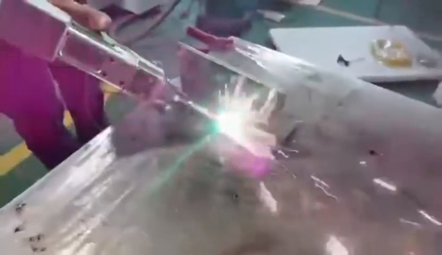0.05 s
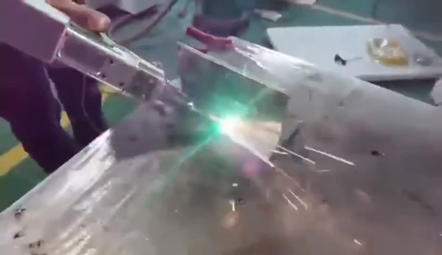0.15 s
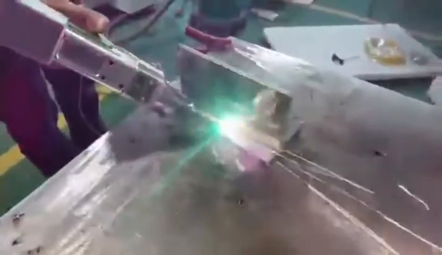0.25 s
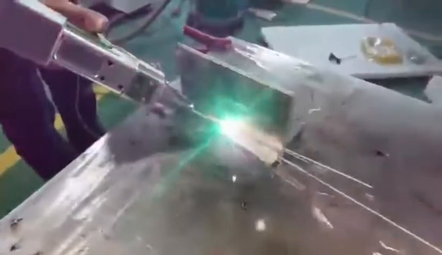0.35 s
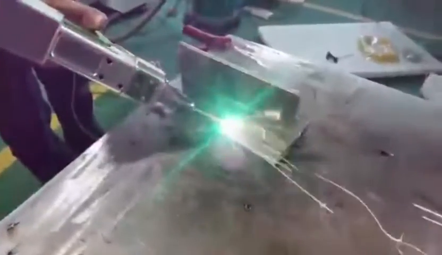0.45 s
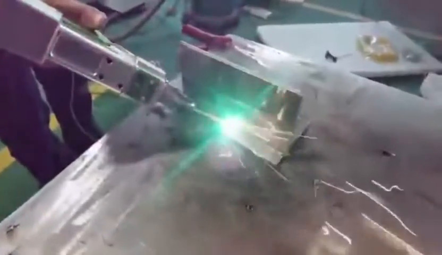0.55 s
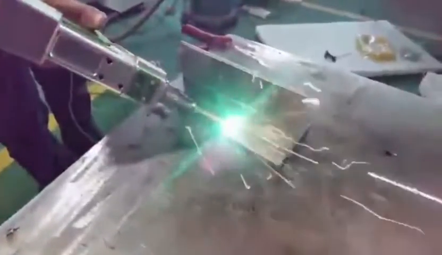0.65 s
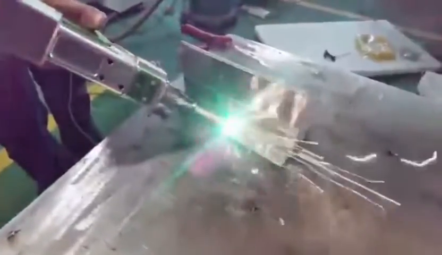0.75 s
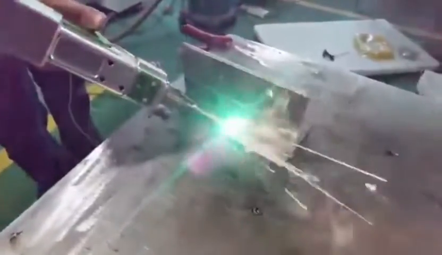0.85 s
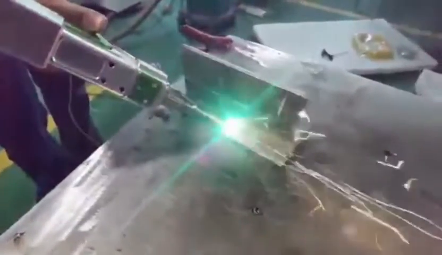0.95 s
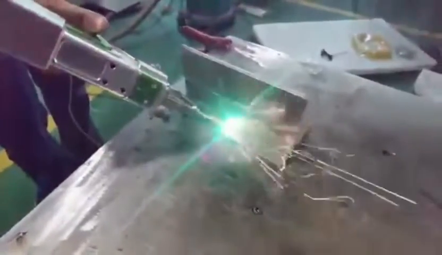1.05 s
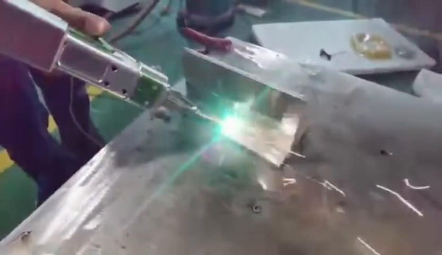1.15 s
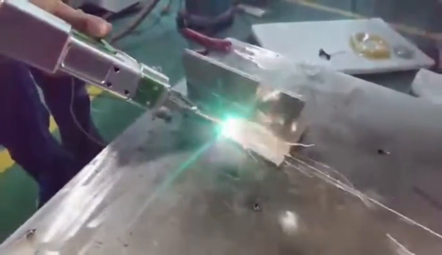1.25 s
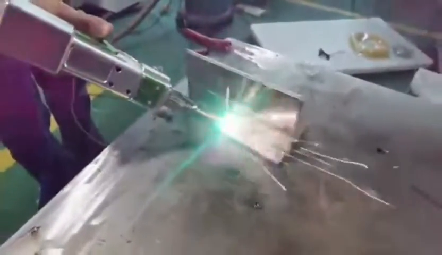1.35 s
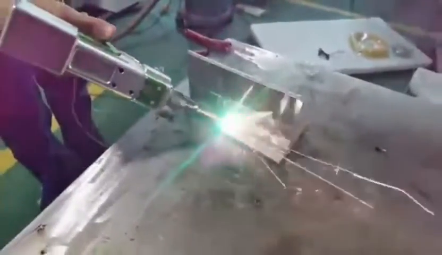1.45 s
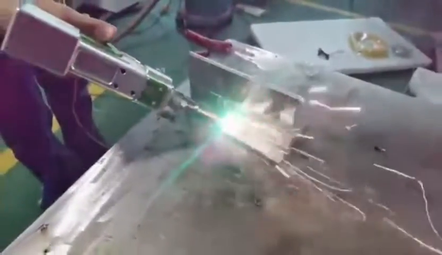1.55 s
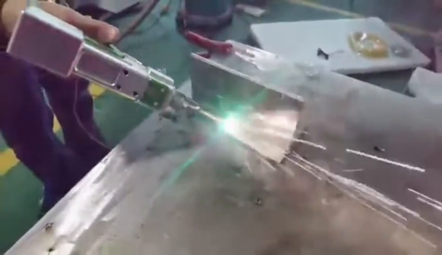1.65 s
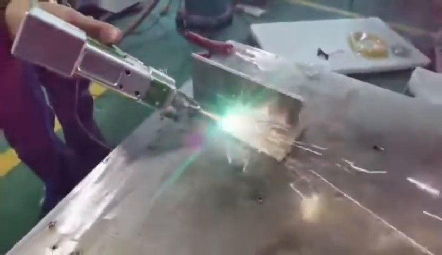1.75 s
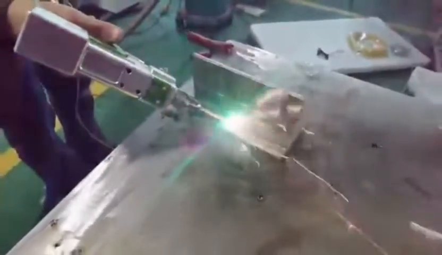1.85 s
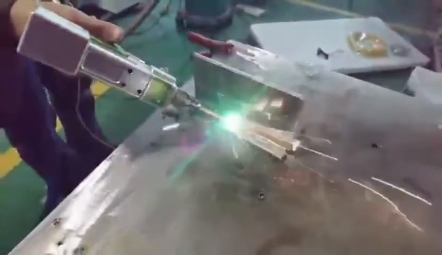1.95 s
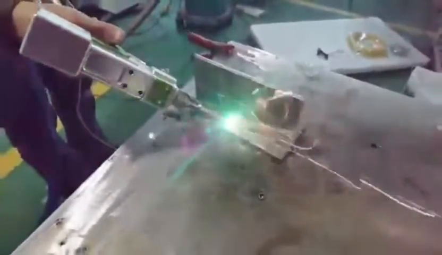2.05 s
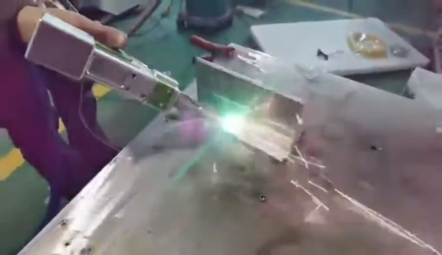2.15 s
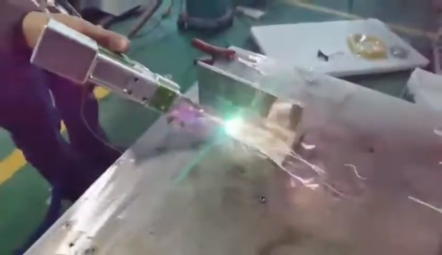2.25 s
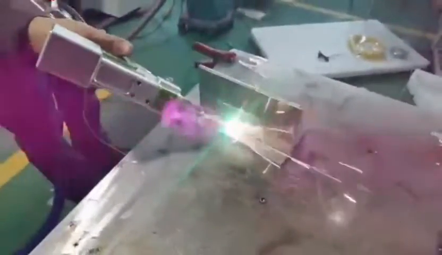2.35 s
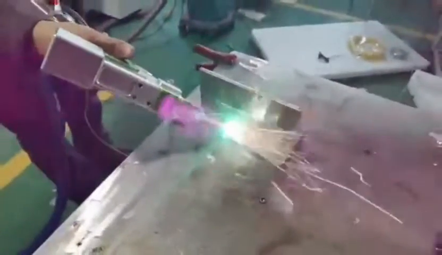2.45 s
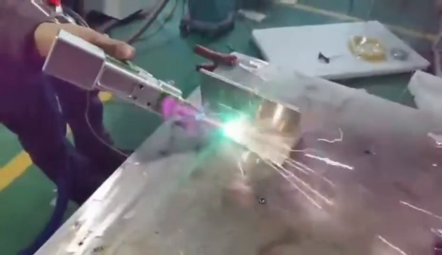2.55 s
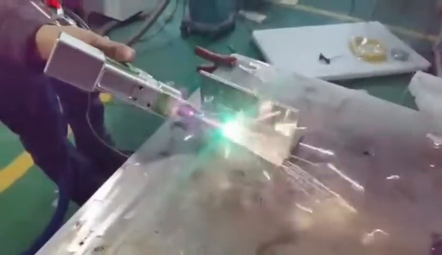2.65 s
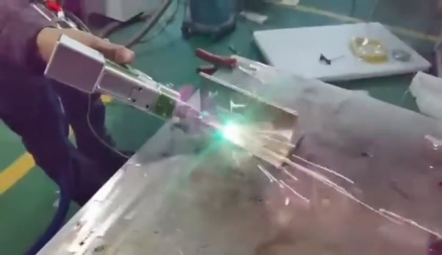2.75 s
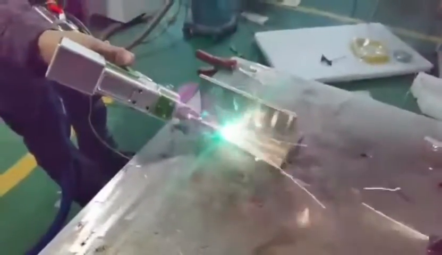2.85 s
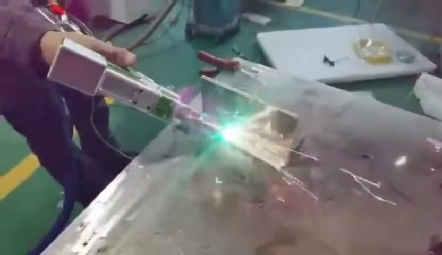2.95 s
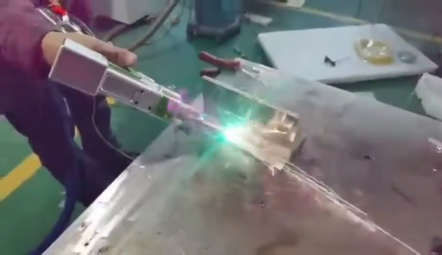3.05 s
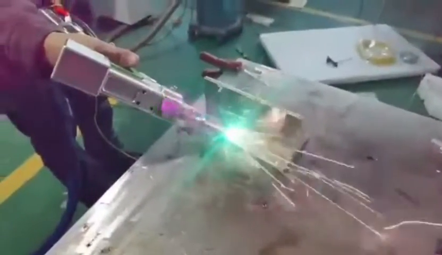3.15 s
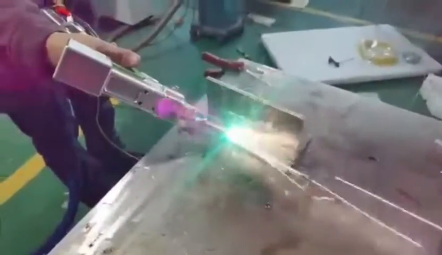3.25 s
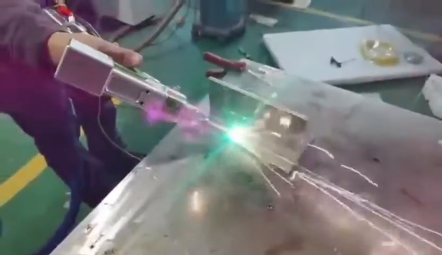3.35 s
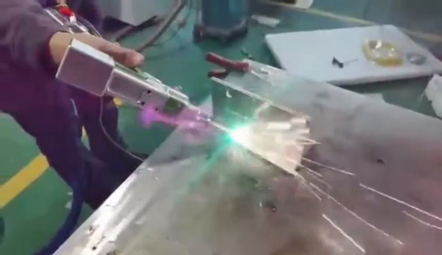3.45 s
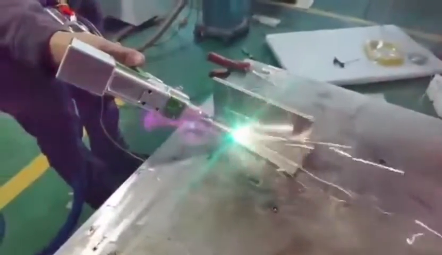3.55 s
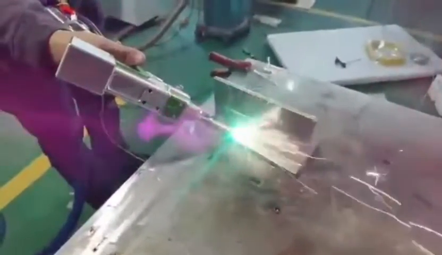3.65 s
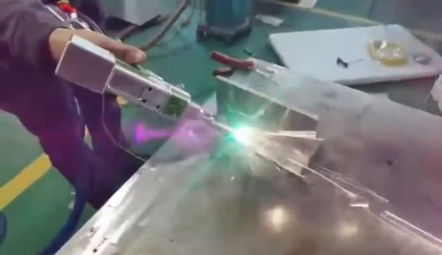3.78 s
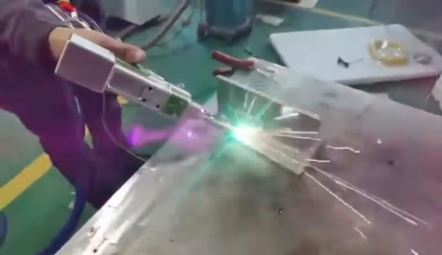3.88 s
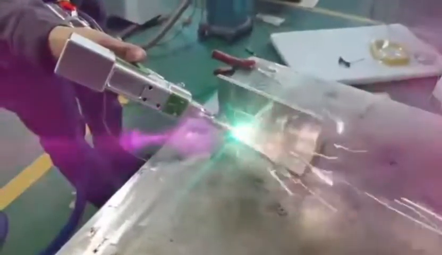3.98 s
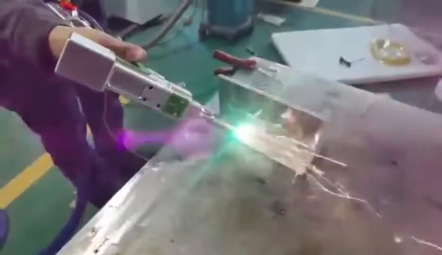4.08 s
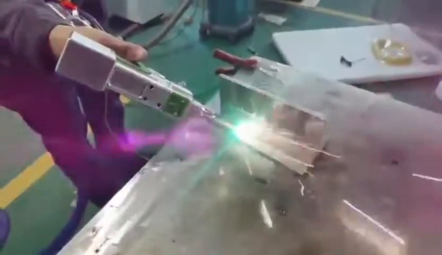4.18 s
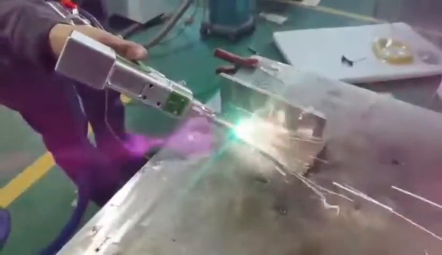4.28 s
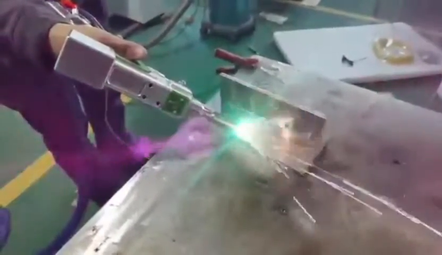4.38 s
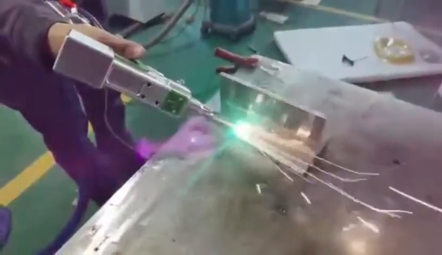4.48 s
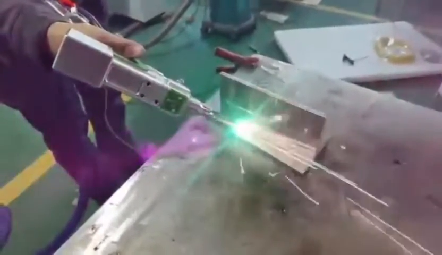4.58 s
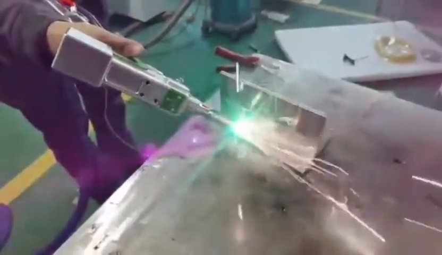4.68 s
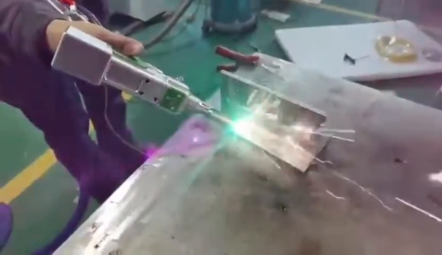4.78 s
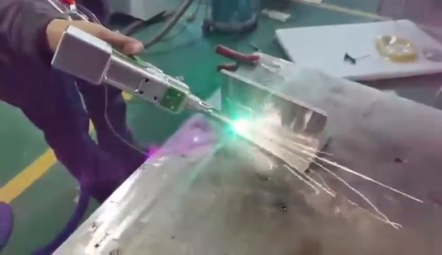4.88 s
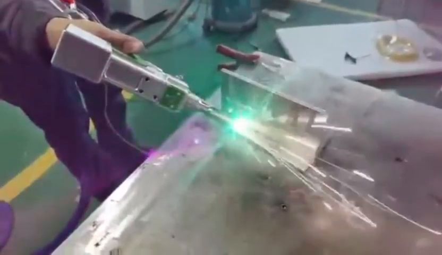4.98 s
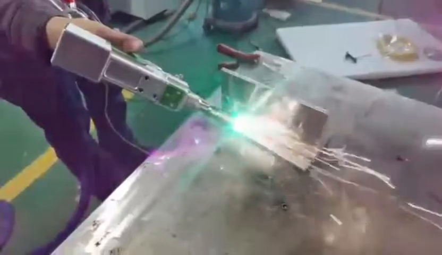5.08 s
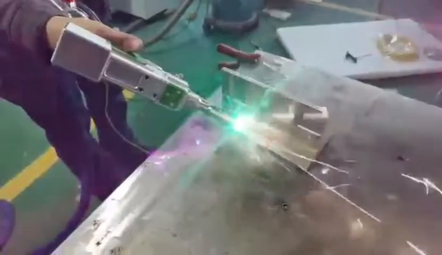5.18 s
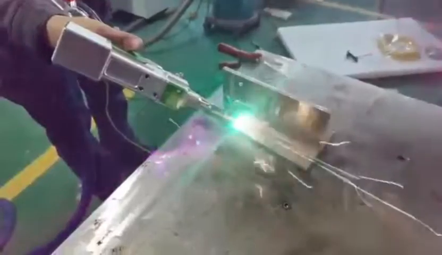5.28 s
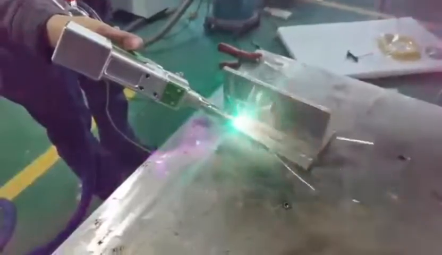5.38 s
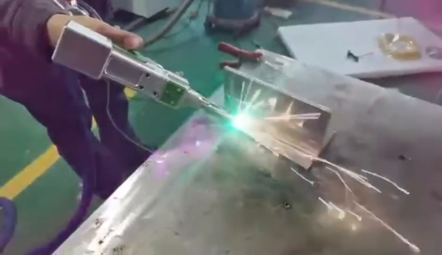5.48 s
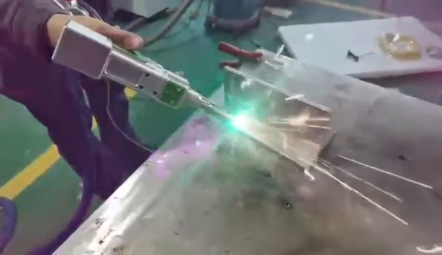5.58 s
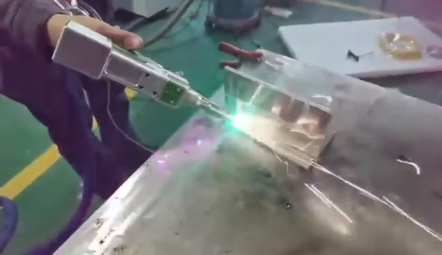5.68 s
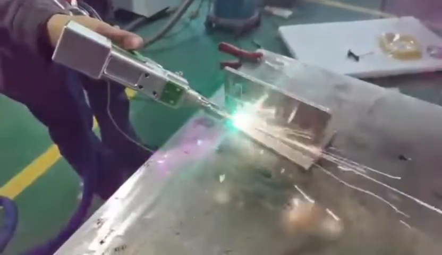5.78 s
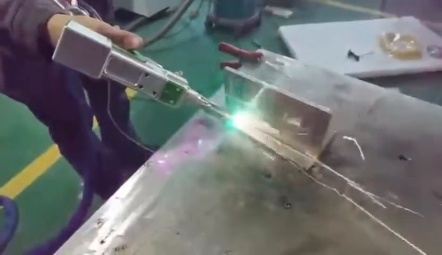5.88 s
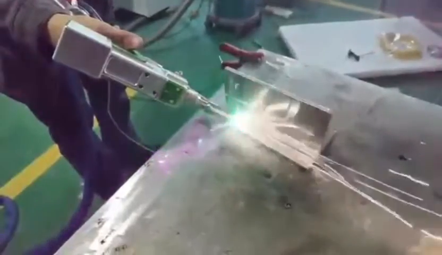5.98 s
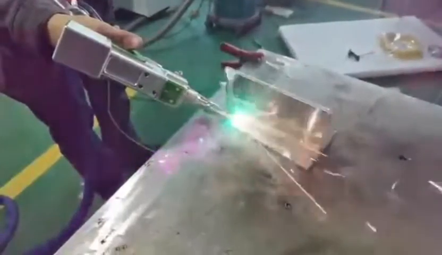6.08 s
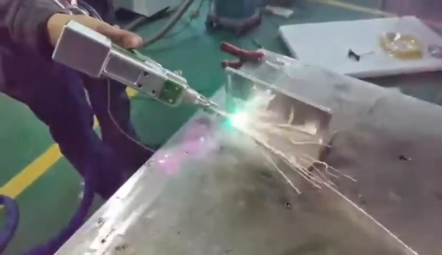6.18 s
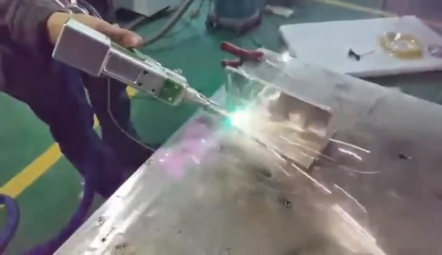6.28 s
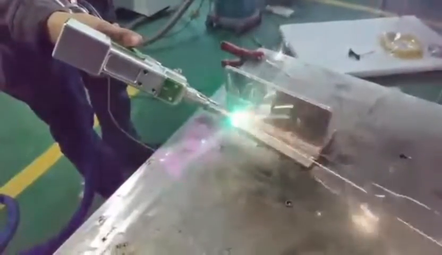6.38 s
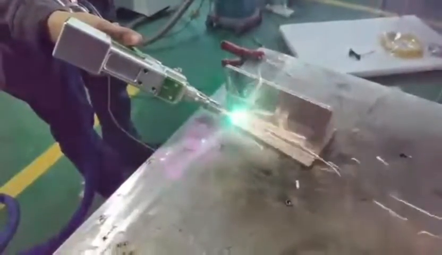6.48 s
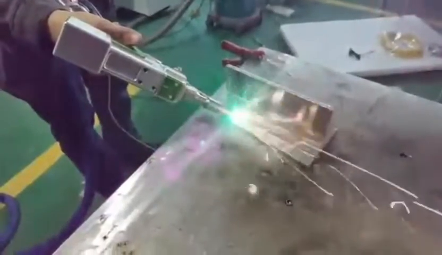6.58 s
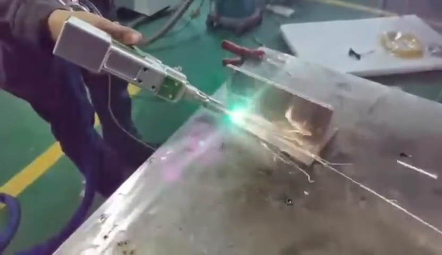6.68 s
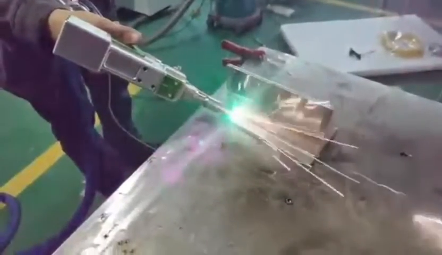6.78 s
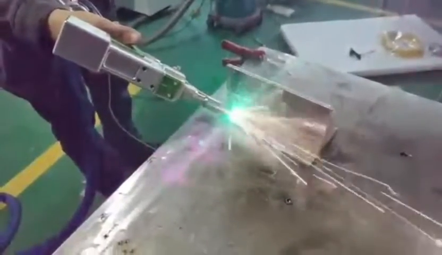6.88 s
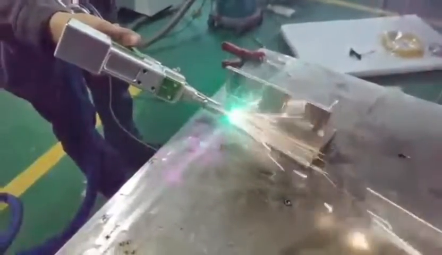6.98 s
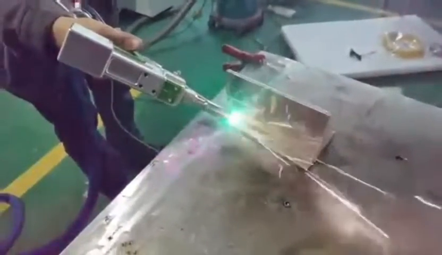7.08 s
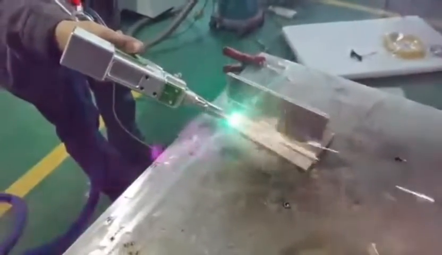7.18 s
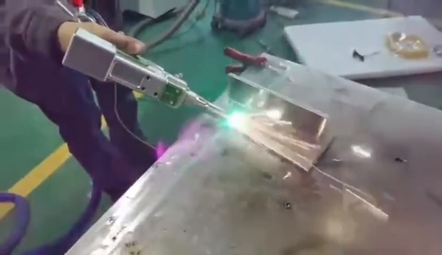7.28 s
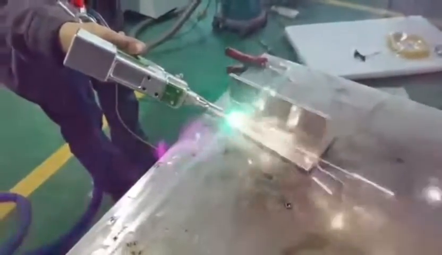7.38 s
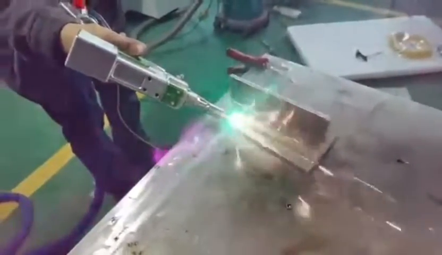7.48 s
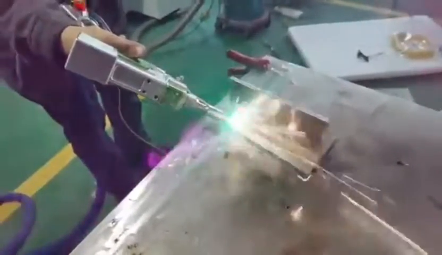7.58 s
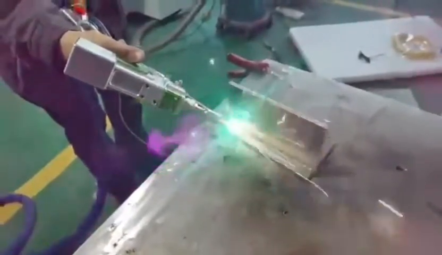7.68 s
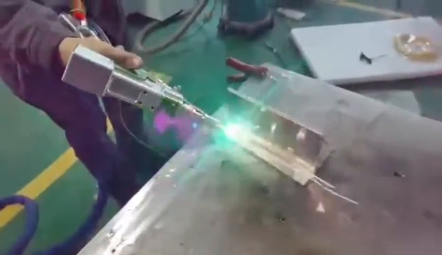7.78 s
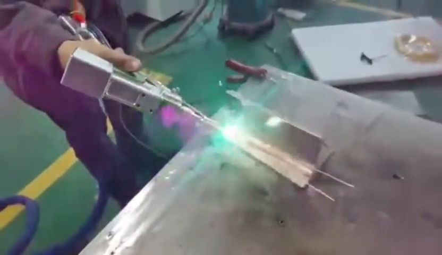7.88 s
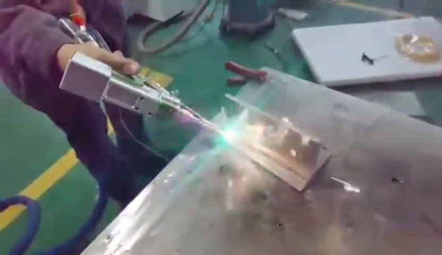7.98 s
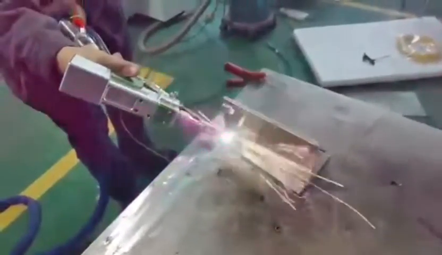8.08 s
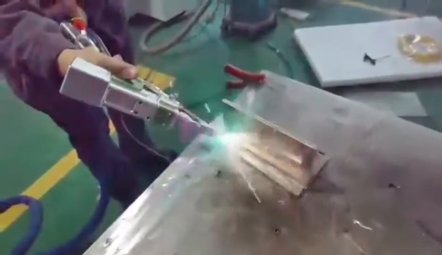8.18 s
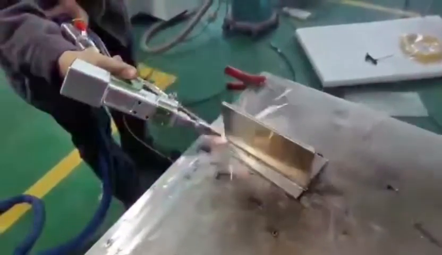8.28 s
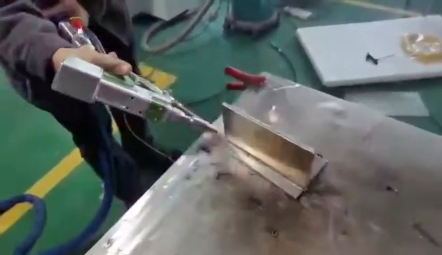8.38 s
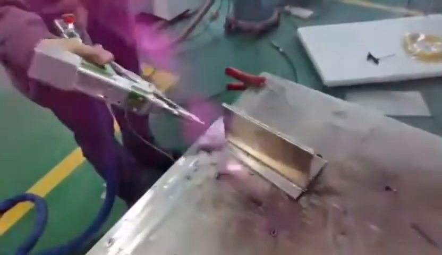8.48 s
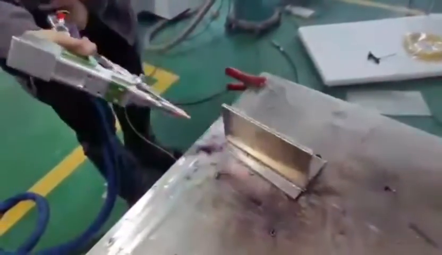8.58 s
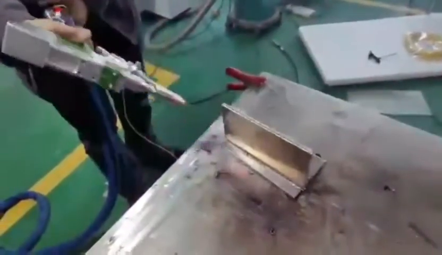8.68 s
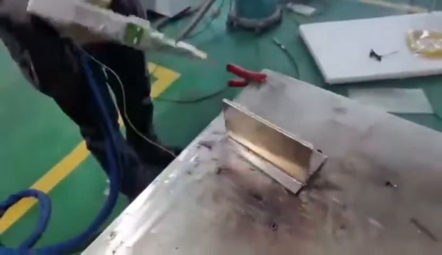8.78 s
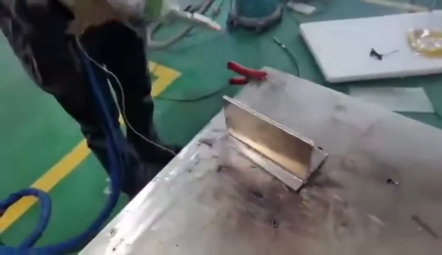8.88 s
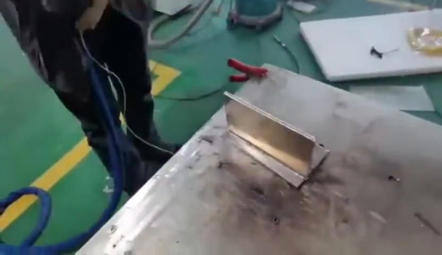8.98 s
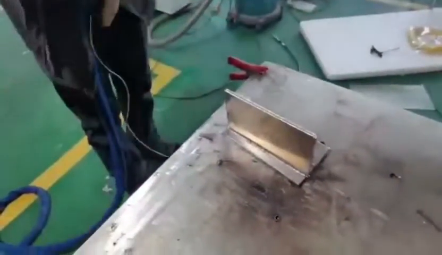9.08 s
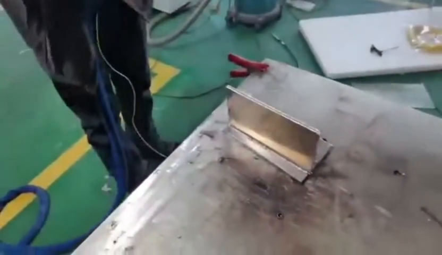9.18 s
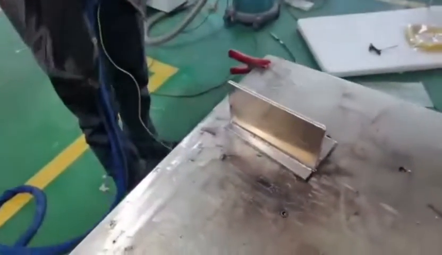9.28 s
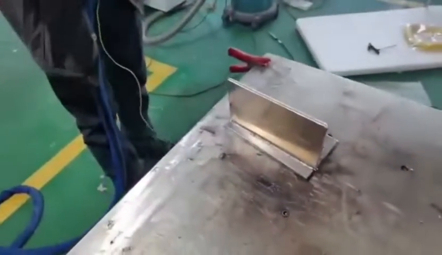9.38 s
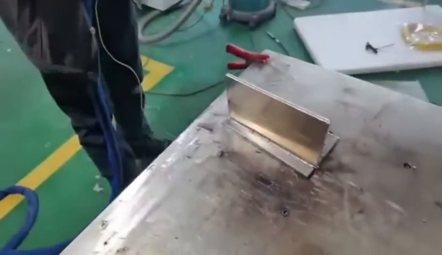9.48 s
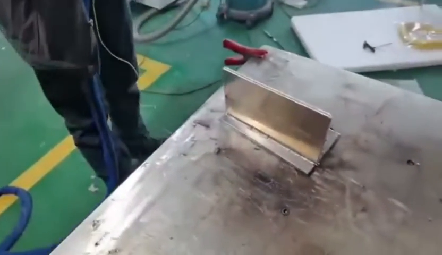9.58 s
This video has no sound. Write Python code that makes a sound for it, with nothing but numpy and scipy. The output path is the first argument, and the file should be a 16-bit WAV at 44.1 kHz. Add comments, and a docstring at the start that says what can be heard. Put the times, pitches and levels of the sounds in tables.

```python
"""A harsh hiss throbs about 15 times a second, close by: a handheld laser welder runs along a steel corner.
The vapour jet is noise with tiny bursts, coloured by the corner and table; the boiling pool sputters lower.
Spurts and ticks break out until the beam stops; shielding gas blows on through a ringing nozzle.
Machines drone and hum behind, from filtered noise and sines; damped swings with snaps make soft knocks."""
import sys
import numpy as np
from scipy import signal
from scipy.fft import rfft, irfft, next_fast_len
from scipy.io import wavfile
from scipy.ndimage import uniform_filter1d

SR = 44100
rng = np.random.default_rng(int(sys.argv[2]) if len(sys.argv) > 2 else 0)


def store_wav(level_fs):
    """Save 16-bit WAV to argv[1]."""
    pcm = np.round(np.clip(np.atleast_2d(level_fs), -1, 1) * 32767)
    wavfile.write(sys.argv[1], SR, pcm.T.astype(np.int16))


N = 425113

# slow course of the jet, sinking at the end of the seam, before surges and stalls: time_s, level_db
JET_COURSE = [(0, -28), (.7, -27.5), (1.1, -29.5), (1.75, -30), (2.5, -30), (4.15, -27.5), (4.5, -28.5),
              (5.3, -28), (6.5, -27.5), (7.4, -27), (7.85, -30), (8.16, -34), (8.22, -40), (8.265, -34),
              (8.32, -50)]
# surges where the melt boils harder: centre_s, gain_db
JET_SURGES = [(.07, 1), (.49, 1.5), (.755, 2), (1.06, 3), (1.57, 1.5), (1.84, 0.5), (2.045, 1), (5.95, 2.5)]
# momentary stalls, a negative depth being a lift: centre_s, depth_db
JET_STALLS = [(.03, 4), (1.39, 1.5), (1.5, 3), (2.27, 2.5), (3.01, 1.5), (4.46, 2.5), (6.21, 2.5),
              (7.34, 1.5), (7.67, 0.5), (1.68, 2), (1.75, 3), (6.53, -1.5), (7.46, 1), (8.062, 2)]
# loud spurts of vapour: start_s, nominal_peak_db
VAPOUR_SPURTS = [(1.4167, -13), (2.4394, -15), (4.5331, -11.5), (4.68, -11.5), (4.9387, -18.5),
                 (5.7463, -24), (6.4916, -12), (7.1616, -9.5), (7.3706, -10), (8.085, -14)]
# size of the throb before evening: time_s, depth_db
THROB_DEPTH = [(0, 2.4), (1, 2.3), (1.4, 3.8), (2.2, 4), (3, 2.8), (4.2, 1.5), (4.6, 1.6), (5.2, 3),
               (6.4, 1.8), (7.4, 2.8), (8.3, 2.2)]
# drift of the corner's colour: time_s, blend (0-1) between two colours, corner_strength (factor on its dB)
CORNER_DRIFT = [(0, 0.17, 1.64), (1.3, 0.2, 1.76), (2, 0.23, 1.9), (2.5, 0.63, 1.8), (4.6, 0.8, 1.64),
                (6, 0.6, 2.09), (7.3, 1, 1.68), (8.05, 0.93, 1.03), (8.3, 0, 0.71)]
# resonances and hollows of the corner, before that factor: centre_hz, width_hz, first_colour_db, second_colour_db
CORNER_RESONANCES = [(2720, 140, 0.5, 1.5), (5900, 980, 1.5, 3), (7300, 960, 6, 7), (7230, 87, 0, 0.5),
                     (7940, 386, 3, 2.5), (8510, 810, -7, 3), (10200, 850, -2, 4), (11570, 550, -4.5, -7.5),
                     (12730, 280, 5, -1), (13670, 470, 9.5, -1)]
# relative spectrum of the jet: freq_hz, level_db (per Hz)
JET_SPECTRUM = [(1700, -72), (2180, -12.5), (2430, 1), (3200, 1), (4200, 1), (5500, 0.5), (7000, -2),
                (9000, -3), (12000, 2.5), (14000, -9.5)]
# relative spectrum of the melt pool: freq_hz, level_db (per Hz)
POOL_SPECTRUM = [(60, -17), (250, -1), (450, -4), (650, 2), (1000, 0), (1350, 5), (1600, 5), (1950, 5),
                 (2200, 5.5), (3000, -50.5)]
# cancelling echoes off plates and table, one course per notch, before random depth: time_s, centre_hz, depth_db
ECHO_NOTCHES = [
    [(2.3, 3000, 0), (2.8, 2980, 8), (5.5, 2930, 8), (7.2, 3000, 11)],
    [(1.3, 3450, 8), (1.5, 3150, 6), (2.3, 3250, 8), (3.1, 3590, 19), (3.7, 3580, 16), (4.2, 3480, 3),
     (5, 3410, 11), (7.7, 3550, 18)],
    [(2.1, 4150, 0), (2.6, 4370, 17), (3.6, 4440, 15), (4.2, 4480, 4), (6.6, 4450, 3), (7.2, 4560, 16)],
    [(1.8, 5260, 4), (5.5, 4980, 5), (7.7, 5160, 13)],
    [(3.2, 5650, 5), (5.5, 5520, 6), (7.4, 5680, 9)],
    [(0, 8450, 8), (2, 8600, 18), (5.2, 8650, 9), (7.5, 8400, 8)],
]
# gliding cuts that turn the hiss hollow and phasey, before overdrive and wavering:
# start_s, end_s, start_hz, end_hz, width_hz, depth_db
PHASEY_HOLLOWS = [(0, 0.555, 3180, 3150, 229, 38), (.55, 1.108, 3040, 3340, 220, 12),
                  (1.45, 2.08, 3110, 3200, 224, 25), (2.078, 2.37, 3220, 3250, 229, 34),
                  (0, 1.08, 3920, 4050, 278, 12.5), (0.368, 0.787, 3920, 4000, 220, 47),
                  (1.464, 1.75, 3990, 3910, 280, 22), (1.75, 2.04, 3970, 3960, 270, 51),
                  (2.035, 2.254, 4050, 4100, 286, 41), (2.25, 2.36, 4200, 4260, 250, 38),
                  (0, 0.752, 2040, 2070, 180, 14), (0.798, 1.13, 2040, 2160, 220, 24),
                  (1.13, 2.4, 1950, 2170, 170, 8), (2.415, 3.057, 2220, 2180, 220, 14),
                  (2.765, 2.86, 1820, 1800, 690, 24.5), (3.143, 3.913, 2190, 2180, 230, 25),
                  (3.975, 4.303, 2180, 2170, 290, 29.5), (4.38, 4.47, 1950, 2130, 330, 37),
                  (4.656, 5.14, 2140, 2150, 274, 21), (5.348, 5.754, 2050, 2200, 199, 14),
                  (6.187, 6.294, 1930, 1920, 374, 23), (6.5, 6.584, 1680, 1630, 600, 20),
                  (2.097, 2.144, 1500, 1500, 800, 16), (3.43, 3.487, 1650, 1650, 800, 14),
                  (5.76, 6.14, 1930, 2100, 200, 12.5), (6.596, 7.22, 1900, 2120, 190, 7),
                  (7.33, 7.65, 2200, 2250, 200, 12), (7.218, 7.327, 2190, 2260, 220, 25),
                  (7.652, 7.854, 2190, 2310, 200, 21), (7.846, 7.982, 955, 1070, 328, 21),
                  (7.87, 8.01, 1920, 2250, 327, 28), (8.013, 8.093, 2000, 1900, 300, 22)]
# brief dropouts of the range under the hiss: centre_s, length_s (between the edges), depth_db
BODY_DIPS = [(0.031, 0.033, 17), (0.098, 0.027, 6), (0.175, .016, 9), (0.23, 0.022, 12), (0.809, 0.015, 10),
             (0.876, 0.014, 10), (0.914, 0.025, 8), (1.119, 0.03, 6), (1.503, 0.027, 17),
             (1.655, 0.033, 13), (1.812, 0.011, 9), (1.876, 0.0086, 11), (1.936, 0.022, 15),
             (1.984, 0.023, 8), (2.074, 0.013, 12), (2.123, 0.035, 3), (2.596, 0.039, 6.5),
             (2.705, 0.025, 13), (2.79, 0.027, 10), (2.836, 0.0089, 14), (3.24, 0.017, 10),
             (3.463, 0.051, 3), (3.633, 0.013, 10), (4.034, 0.028, 9), (4.181, 0.015, 11),
             (4.262, 0.023, 9), (4.354, 0.051, 7), (4.763, 0.013, 13), (5.082, 0.012, 9),
             (5.191, 0.037, 12), (5.421, 0.011, 13.5), (6.284, 0.019, 13), (6.512, 0.036, 3),
             (6.702, 0.019, 10), (6.735, 0.016, 12), (6.96, 0.058, 15), (7.113, 0.031, 16),
             (7.342, 0.062, 14), (7.806, .013, 13), (7.863, 0.026, 11), (7.914, 0.011, 16),
             (7.955, 0.016, 12), (8.017, 0.018, 6)]
# droplets bursting from the melt: time_s, peak_db
DROPLET_SPITS = [(2.378, -29), (2.507, -28), (6.961, -22), (8.275, -24)]
# relative spectrum of a droplet's tick: freq_hz, level_db
SPIT_SPECTRUM = [(200, -11), (2500, -2), (9000, 6), (14000, -4), (16000, -40)]
# course of the shielding gas, before trim and gusts: time_s, level_db
GAS_COURSE = [(8.3, -38.5), (8.45, -42), (8.65, -43), (8.75, -46.5), (8.9, -51), (9.1, -55), (9.3, -62),
              (9.4, -73), (9.63, -83)]
# relative spectrum of the gas stream: freq_hz, level_db (per Hz)
GAS_SPECTRUM = [(600, -12.5), (2500, -8.5), (4500, -7), (7500, -9.5), (9000, -3.5), (9900, -16),
                (11000, -13.5), (12000, -2.5), (12800, -24.5), (13500, -26), (14000, -2)]
# resonances and hollows of the gas nozzle, before the ring factor: centre_hz, width_hz, level_db
NOZZLE_RESONANCES = [(3640, 410, 11), (4500, 500, -4.5), (5180, 360, 7), (5850, 450, -6), (6620, 600, 11),
                     (7750, 500, 1), (11270, 840, 11.5)]
# ringing of the nozzle as it clears the plate: time_s, ring (factor on the nozzle's dB)
NOZZLE_RING = [(8.42, .3), (8.5, 1.5), (8.75, .94), (9.1, .85)]
# colour added to the gas once the gun has turned away: freq_hz, gain_db
GAS_AWAY = [(3000, -15), (7500, 1), (9000, 2), (14000, -30)]
# bench knocks: start_s, swing_db (before damping), pitch_hz, decay_s, snap_peak_db
BENCH_KNOCKS = [(0.189, -50, 50, 0.023, -70), (9.3615, -37, 422, 0.002, -22.5),
                (9.4086, -35.5, 99, 0.0079, -62)]
# relative spectrum of a knock's snap: freq_hz, level_db
SNAP_SPECTRUM = [(100, -10), (900, 4), (1600, -12), (2400, -2), (3500, -8), (4300, -15), (5600, -20),
                 (7000, -35), (9200, -14), (11500, -36), (13000, -60)]
# faint scuffs: centre_s, length_s, level_db
FAINT_SCUFFS = [(9.33, 0.043, -55), (9.363, 0.0033, -47), (9.578, 0.02, -57)]
# relative spectrum of the rubbing: freq_hz, level_db
SCUFF_SPECTRUM = [(200, 10), (1500, -2), (4000, -4), (7500, -9), (9000, -22), (14000, -35)]
# decay of the hall: freq_hz, t60_s
HALL_DECAY = [(300, 0.23), (2700, 0.19), (7000, 0.7), (14000, 0.083)]
# course of the workshop machines, before layer trims: time_s, level_db
SHOP_COURSE = [(0, -67.5), (1.5, -66), (3.2, -62), (6.6, -61.5), (7.4, -56), (7.9, -64.5), (8.2, -59),
               (9.63, -54.5)]
# relative spectrum of their drone and air: freq_hz, level_db (per Hz)
SHOP_SPECTRUM = [(20, -28), (48, -3.5), (80, -10.5), (130, -3.5), (165, -4.5), (215, 6), (280, -7),
                 (390, -12.5), (600, -7.5), (1000, -14), (2000, -17), (3500, -23.5), (5000, -30.5),
                 (14000, -63)]
# partials of the hum before they waver: pitch_hz, level_db (relative to the machines' course)
MACHINE_HUM = [(49.5, -18), (100, -19), (200.3, -8.5), (301, -13.5), (501, -14.5), (578, -17)]

THROB_HZ, THROB_START_S = 14.804, .0032
SURGE_S, STALL_S = .093, .043
UNSTEADY_DB, UNSTEADY_HZ = .7, 22
POOL_DB = -49.5  # before the throb and sputter
POOL_FOLLOWS = .41  # dB of pool per dB of jet
SPUTTER_DB, SPUTTER_HZ = 3.3, 24
LAST_SPIT_AT_S, LAST_SPIT_S, LAST_SPIT_DB = 8.262, .095, 8.5
TREMOR = .004  # rms share by which the hand shifts the notches
NOTCH_WIDTH_HZ, NOTCH_WIDENING = 75, .017  # base width, and extra Hz per Hz of centre
HOLLOW_FADE_S = .014
DIP_BAND_HZ, DIP_EDGE_S = (260, 2250), .004
HALL_DB = -20  # against the direct weld
AIR_CEILING_DB = -55  # before trim
EDGE_HZ = 14150

FRAME, HOP = 1024, 256  # samples
TIME = np.arange(N) / SR
FRAME_TIME = np.arange(N // HOP + 5) * HOP / SR
BIN_HZ = np.fft.rfftfreq(FRAME, 1 / SR)


def jet(flare, hollow_db):
    """Vapour rushes out of the weld as turbulent noise and the corner rings."""
    blend, ring = (column[:, None] for column in follow(CORNER_DRIFT, FRAME_TIME))
    corner_db = 0
    for hz, width, first_db, second_db in CORNER_RESONANCES:
        corner_db = corner_db + bump(BIN_HZ, hz, width) * (first_db + (second_db - first_db) * blend)
    ripple_db = far_echo_db(delay_s=.0043, strength=.38, sway=.006)
    # the colour flickers in small patches, most in the high treble
    flicker_size_db = np.interp(BIN_HZ, [7800, 8400], [2.9, 4.8])
    flicker_db = flicker_size_db * np.minimum(patches(size=(9, 4)), 1)
    field_db = read(JET_SPECTRUM, BIN_HZ) + ring * corner_db - hollow_db + ripple_db + flicker_db
    hiss = shaped(sizzle(per_s=780, spread_db=-1.0, share=.035), field_db)
    level = np.hypot(gain_of(strength_db()) * flare, spurts(below_peak_db=16.0, rise_s=.0083))
    return hiss * level * beam_on()


def strength_db():
    """The jet's level: a slow course with surges, stalls and a random unsteadiness."""
    surge_db = sum(db * bump(TIME, s, SURGE_S) for s, db in JET_SURGES)
    stall_db = sum(db * bump(TIME, s, STALL_S) for s, db in JET_STALLS)
    return follow(JET_COURSE)[0] + surge_db - stall_db + UNSTEADY_DB * wander(UNSTEADY_HZ)


def spurts(below_peak_db, rise_s):
    """Envelope of the larger flares of vapour: a quick rise and a slower fall."""
    envelope = np.zeros(N)
    for s, peak_db in VAPOUR_SPURTS:
        age = np.maximum(TIME - s, 0) / rise_s
        envelope += gain_of(peak_db - below_peak_db) * age * np.exp(1 - np.minimum(age, 20))
    return envelope


def sizzle(per_s, spread_db, share):
    """Turbulence mixed with tiny bursts of boiling metal, random in moment, sign and size."""
    sizes = gain_of(spread_db * np.minimum(rng.exponential(1, N), 5))
    happens = rng.random(N) < per_s / SR
    pops = evened(sizes * rng.choice([-1, 1], N) * happens)
    return np.sqrt(1 - share) * rng.standard_normal(N) + np.sqrt(share) * pops


def throb(depth_db, rise_s, uneven):
    """The melt flares at a steady beat: a quick rise and a slower fall, of uneven strength."""
    age = (TIME - THROB_START_S) % (1 / THROB_HZ) / rise_s
    flare = age * np.exp(1 - age) * (1 + uneven * wander(18))
    return evened(gain_of(depth_db * flare))


def beam_on():
    """1 while the laser fires, then a short fade to 0 as the melt goes quiet."""
    return np.interp(TIME, [8.29, 8.34], [1, 0])


def pool(flare, hollow_db):
    """The boiling melt sputters in the middle range, in step with the jet, and spits as the beam leaves."""
    flicker_size_db = 6 * np.interp(BIN_HZ, [500, 1100], [.6, 1.2])
    flicker_db = flicker_size_db * np.minimum(patches(size=(6, 4)), 1.6)
    field_db = read(POOL_SPECTRUM, BIN_HZ) - hollow_db + flicker_db
    sputter = shaped(sizzle(per_s=900, spread_db=4.0, share=.19), field_db)
    # squashing the wander keeps the level mostly up, with brief dips
    surge = evened(gain_of(SPUTTER_DB * np.tanh(2 * wander(SPUTTER_HZ) + 1)))
    jet_db = follow(JET_COURSE)[0]
    follow_db = POOL_FOLLOWS * (jet_db - np.median(jet_db))
    last_spit_db = LAST_SPIT_DB * bump(TIME, LAST_SPIT_AT_S, LAST_SPIT_S)
    return sputter * gain_of(POOL_DB + follow_db + last_spit_db) * flare * surge * beam_on()


def spits():
    """Single droplets burst from the melt with a sharp tick."""
    tick = click(SPIT_SPECTRUM)
    return sum(gain_of(db) * placed(tick, s) for s, db in DROPLET_SPITS)


def notch_db():
    """Depth of the echoes' notches (frames x bins): they glide on set courses and waver with the hand."""
    tremor = 1 + TREMOR * np.interp(FRAME_TIME, TIME, wander(4.3))[:, None]
    depth_db = 0
    for course in ECHO_NOTCHES:
        hz, db = (column[:, None] for column in follow(course, FRAME_TIME))
        width = NOTCH_WIDTH_HZ + NOTCH_WIDENING * hz
        depth_db = depth_db + db * bump(BIN_HZ, hz * tremor, width)
    return depth_db * np.maximum(1.35 + .55 * patches(size=(16, 8)), 0)


def far_echo_db(delay_s, strength, sway):
    """A later echo combs the hiss into fine bands that drift with the hand."""
    delay = delay_s * (1 + sway * np.interp(FRAME_TIME, TIME, wander(.58)))
    share = np.clip(strength * (1 + .7 * patches(size=(40, 12))), 0, .9)
    return 20 * np.log10(abs(1 + share * np.exp(2j * np.pi * BIN_HZ * delay[:, None])))


def hollows(x):
    """Cuts narrow, gliding hollows out of the sound; each opens and closes quickly, and its depth wavers."""
    t = FRAME_TIME[:, None]
    depth_db = np.zeros((len(FRAME_TIME), len(BIN_HZ)))
    for start, end, start_hz, end_hz, width, db in PHASEY_HOLLOWS:
        present = np.clip(np.minimum(t - start, end - t) / HOLLOW_FADE_S + .5, 0, 1)
        now = present[:, 0] > 0
        centre = np.interp(t[now], [start, end], [start_hz, end_hz])
        # the overdriven bell gives a flat floor
        bell = np.minimum(1.7 * bump(BIN_HZ, centre, width), 1.35)
        depth_db[now] += db * present[now] * bell
    depth_db *= np.maximum(1 + .4 * patches(size=(12, 8)), 0)
    return filtered(x, gain_of(-depth_db))


def dips(x):
    """Ducks the range under the hiss at each brief dropout."""
    band = signal.butter(6, DIP_BAND_HZ, "bandpass", fs=SR, output="sos")
    body = signal.sosfiltfilt(band, x)
    depth_db = 0
    for s, length, db in BODY_DIPS:
        outside_s = abs(TIME - s) - length / 2
        depth_db = depth_db + db * np.interp(outside_s, [0, DIP_EDGE_S], [1, 0])
    return x - body * (1 - gain_of(-depth_db))


def gas():
    """Shielding gas rushes as noise; the nozzle rings clear of the plate, then the turning gun shades it."""
    sway = 1 + .012 * np.interp(FRAME_TIME, TIME, wander(5))[:, None]
    nozzle_db = sum(db * bump(BIN_HZ, hz * sway, width) for hz, width, db in NOZZLE_RESONANCES)
    ring = follow(NOZZLE_RING, FRAME_TIME)[0][:, None]
    away = np.interp(FRAME_TIME, [8.65, 9.5], [0, 1])[:, None]
    shade_db = read(GAS_AWAY, BIN_HZ)
    flicker_db = 5.5 * np.minimum(patches(size=(12, 7)), .7)
    field_db = read(GAS_SPECTRUM, BIN_HZ) + ring * nozzle_db + away * shade_db + flicker_db
    gust_db = .8 * wander(35)
    return shaped(rng.standard_normal(N), field_db) * gain_of(follow(GAS_COURSE)[0] - 3.5 + gust_db)


def knocks():
    """A dry clack and soft thuds: each a damped swing under one sharp snap."""
    snap = click(SNAP_SPECTRUM)
    out = np.zeros(N)
    for s, db, hz, decay_s, snap_db in BENCH_KNOCKS:
        age = np.maximum(TIME - s, 0)
        out -= gain_of(db) * np.exp(-age / decay_s) * np.sin(2 * np.pi * hz * age)
        out -= gain_of(snap_db) * placed(snap, s)
    return out


def scuffs():
    """Brief soft rubbing: coloured noise under bell-shaped swells."""
    rub = coloured(rng.standard_normal(N), SCUFF_SPECTRUM)
    return rub * sum(gain_of(db) * bump(TIME, s, length) for s, length, db in FAINT_SCUFFS)


def hall(x):
    """A diffuse noise tail, each frequency fading at its own rate, slowest around 7 kHz."""
    hz, t, z = signal.stft(rng.standard_normal(SR), SR, nperseg=256)
    decay = gain_of(-60 * t / read(HALL_DECAY, hz)[:, None])
    tail = signal.istft(z * decay, SR, nperseg=256)[1]
    return signal.fftconvolve(x, tail / np.linalg.norm(tail))[:N]


def workshop():
    """Fans drone with a restless low end under a rush of air; mains-driven machines hum across the hall."""
    flicker_size_db = np.interp(BIN_HZ, [300, 700], [4.5, 2])
    flicker_db = flicker_size_db * np.minimum(patches(size=(10, 3)), 1.5)
    air = shaped(rng.standard_normal(N), read(SHOP_SPECTRUM, BIN_HZ) + flicker_db)
    low = signal.sosfiltfilt(signal.butter(2, 400, fs=SR, output="sos"), air)
    restless = evened(gain_of(3.2 * np.minimum(wander(19), 1)))
    hum = np.zeros(N)
    for hz, db in MACHINE_HUM:
        level = gain_of(db + 2.5 * wander(4))
        hum += level * np.sin(2 * np.pi * hz * TIME + .8 * wander(3))
    shop_db = follow(SHOP_COURSE)[0]
    # root 2 turns a sine's rms level into its amplitude
    drone = (low * restless * gain_of(3.5) + np.sqrt(2) * hum) * gain_of(shop_db)
    return drone + (air - low) * gain_of(np.minimum(shop_db, AIR_CEILING_DB) + 2.5)


def gain_of(db):
    """Decibels to amplitude."""
    return 10 ** (np.asarray(db) / 20)


def evened(x):
    """Scales to rms 1."""
    return x / np.sqrt(np.mean(x ** 2) + 1e-20)


def follow(rows, t=TIME):
    """The columns of a curve table at times t."""
    s, *columns = np.transpose(rows)
    return [np.interp(t, s, column) for column in columns]


def read(points, hz):
    """A frequency table read on a log-frequency axis."""
    f, values = np.transpose(points)
    return np.interp(np.log(hz + 1), np.log(f + 1), values)


def bump(x, centre, width):
    """A bell of height 1 and the given full width at half height."""
    return 2 ** (-(2 * (x - centre) / width) ** 2)


def coloured(x, points):
    """Filters x by a spectrum table, to rms 1."""
    size = next_fast_len(N)
    gain = gain_of(read(points, np.fft.rfftfreq(size, 1 / SR)))
    return evened(irfft(rfft(x, size) * gain, size)[:N])


def click(points):
    """One impulse at mid-length, coloured by a spectrum table, to peak 1."""
    impulse = 1. * (np.arange(N) == N // 2)
    sound = coloured(impulse, points)
    return sound / np.abs(sound).max()


def placed(sound, s):
    """Moves a click from mid-length to time s."""
    return np.roll(sound, round(s * SR) - N // 2)


def wander(rate_hz):
    """Smooth chance of rms 1, up to about the given rate."""
    size = next_fast_len(N)
    hz = np.fft.rfftfreq(size, 1 / SR)
    return evened(irfft(rfft(rng.standard_normal(size)) / (1 + (hz / rate_hz) ** 2), size)[:N])


def patches(size):
    """Random patches of rms 1, size = (frames, bins)."""
    field = rng.standard_normal((len(FRAME_TIME), len(BIN_HZ)))
    smooth_in_time = uniform_filter1d(field, size[0], axis=0)
    return evened(uniform_filter1d(smooth_in_time, size[1], axis=1))


def shaped(x, field_db):
    """Gives white x a colour that changes in time (frames x bins) at an even power."""
    gain = gain_of(field_db)
    return filtered(x, gain / np.sqrt(np.mean(gain ** 2, axis=1, keepdims=True)))


def filtered(x, gain):
    """Applies a gain that changes in time and frequency (frames x bins)."""
    overlap = FRAME - HOP
    z = signal.stft(np.pad(x, (0, 2048)), nperseg=FRAME, noverlap=overlap)[2][:, :len(FRAME_TIME)]
    return signal.istft(z * gain.T, nperseg=FRAME, noverlap=overlap)[1][:N]


def scene():
    """Jet and pool share one throb, one quick flutter and one set of echoes; the hall answers faintly."""
    flutter = evened(gain_of(.5 * wander(140)))
    flare = throb(follow(THROB_DEPTH)[0], rise_s=.0062, uneven=.22) * flutter
    hollow_db = notch_db()
    weld = jet(flare, hollow_db) + pool(flare, hollow_db)
    steady = weld + gain_of(HALL_DB) * hall(weld) + gas() + workshop()
    return (dips(hollows(steady)) + spits() + knocks() + scuffs())[None]


def record(dry):
    """The recorder's band limit: a steep low-pass."""
    lowpass = signal.firwin(801, EDGE_HZ, window=("kaiser", 9), fs=SR)
    return signal.oaconvolve(dry, lowpass[None], "same")


dry = scene()
out = record(dry)
store_wav(out)
```